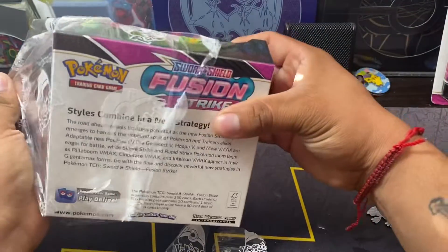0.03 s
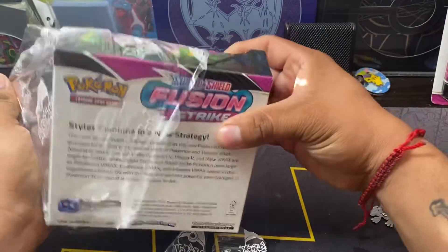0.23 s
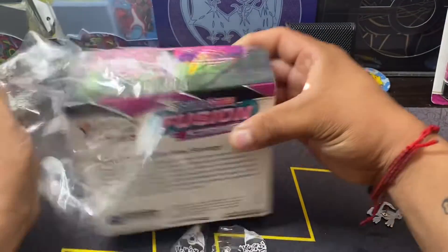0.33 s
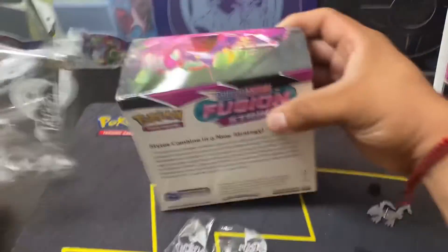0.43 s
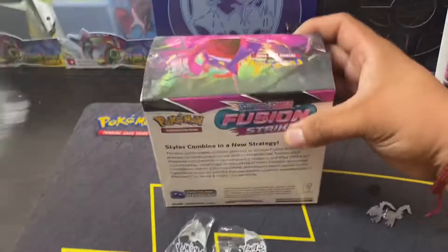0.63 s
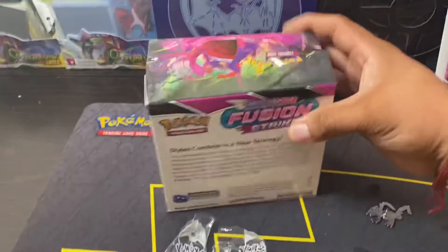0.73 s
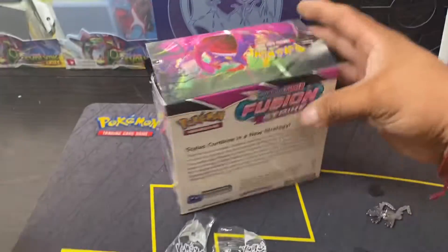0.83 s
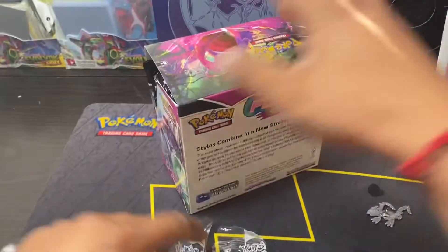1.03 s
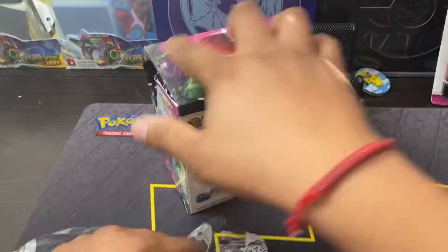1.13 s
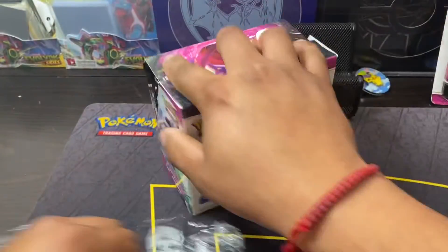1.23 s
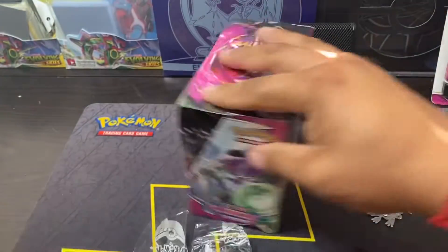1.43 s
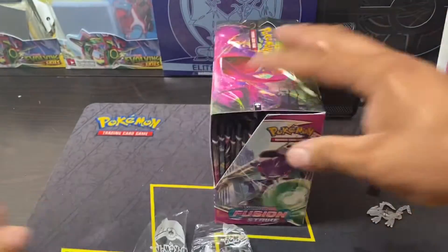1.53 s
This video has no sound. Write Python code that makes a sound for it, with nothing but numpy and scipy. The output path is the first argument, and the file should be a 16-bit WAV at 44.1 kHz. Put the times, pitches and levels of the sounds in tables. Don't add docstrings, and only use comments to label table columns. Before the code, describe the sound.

Plastic film tears off a small cardboard box in two quick, sharp bursts of snaps, knocking the hollow box; it thumps on a table, then loose wrap crinkles under fingers, close to the microphone in a small room.

```python
import sys
import numpy as np
from scipy import signal
from scipy.fft import rfft, irfft, next_fast_len
from scipy.io import wavfile
from scipy.ndimage import uniform_filter1d, map_coordinates

SR = 44100
rng = np.random.default_rng(int(sys.argv[2]) if len(sys.argv) > 2 else 0)


def decibels_to_gain(level_db):
    exponent = np.asarray(level_db, float) / 20
    return 10 ** exponent


def put_to_file(sound):
    columns = np.atleast_2d(sound).T
    safe = np.clip(columns, -1, 1)
    whole_steps = np.round(safe * 32767)
    wavfile.write(sys.argv[1], SR, whole_steps.astype(np.int16))


N = 70560

# [t/s, peak level/dB, film pitch f/Hz, how drawn out/ratio]
TEARING_SNAPS = [(.1968, -26, 5100, 1.5), (.2107, -9, 4400, .8), (.211, -8.5, 10700, .7),
                 (.2136, -11, 10500, 1.1), (.2325, -22, 10000, 2.6), (.2805, -25, 10000, 3.5),
                 (.2861, -5, 9500, .5), (.2872, -13.5, 11000, 1.2), (.2885, -14, 10000, 1.2),
                 (.2897, -18, 9500, 1.6), (.297, -24, 10500, 3.5), (.3245, -21, 9800, 1.5),
                 (.3405, -29, 3500, 1.3), (.3403, -27, 9200, 1.2), (.2866, -21, 3100, 1.5)]
# [t/s, peak level/dB, film pitch f/Hz, how drawn out/ratio]
SINGLE_CREASES = [(.0075, -37, 11500, 3.7), (0.0115, -34.5, 10500, 2.5), (.0195, -43, 12000, 2),
                  (.0634, -39.5, 1760, 1.5), (.0733, -37.5, 6530, 1), (.078, -28.5, 10900, 1.3),
                  (.1112, -43, 12200, 1.5), (0.117, -40, 10250, 1), (0.135, -36, 11000, 1.6),
                  (0.16, -44, 9900, 2), (.1812, -39, 10400, 3.5), (.2045, -29, 10900, 1),
                  (0.396, -38, 3650, 1), (.3958, -41, 10700, 1), (0.4107, -31, 9860, 0.66),
                  (.415, -38, 12200, 3), (.4501, -36, 5800, 1), (.4502, -39, 1800, 1.1),
                  (.4638, -37.5, 3550, 1.1), (0.464, -40.5, 6500, 1), (.466, -42, 11100, 2),
                  (0.563, -27, 9300, 1.1), (.563, -25, 5940, 1.1), (.5632, -36, 1990, 1.47),
                  (0.5825, -23, 11400, 2), (0.5827, -33, 9730, 1.5), (.5983, -37.5, 3420, 1.26),
                  (0.6038, -33.5, 9400, 1.2), (0.611, -37, 5700, 1), (0.6576, -45, 9000, 2.5),
                  (.7252, -34, 12700, 2.5), (0.7553, -36, 9540, 3), (0.7595, -31.5, 3980, 0.93),
                  (0.7604, -30.5, 4560, 2.2), (0.7606, -30, 6100, 2.2), (.8018, -37, 12500, 1.5),
                  (0.8054, -30, 11900, 1.1), (.8057, -34, 15000, 1), (.808, -35.5, 10800, 1.7),
                  (0.8144, -37.5, 3870, 1.5), (0.8154, -34, 12700, 2.9), (.859, -35.5, 4600, 3.2),
                  (.8625, -35.5, 10100, 2), (0.8762, -37, 10800, 1.2), (.8865, -37, 10200, 1.2),
                  (.8896, -34.5, 9800, 1), (0.8928, -37, 4400, 1.4),
                  (.9294, -43, 10100, 1.4), (0.9348, -38, 5170, .8), (0.9396, -31.5, 10900, 1),
                (.9452, -32, 10100, 1.2), (.946, -39, 5000, 1), (0.9672, -36, 5330, 3),
                (.97, -36, 11800, 2), (0.9792, -32.5, 3800, 1.6), (0.979, -32.5, 5500, 1.6),
                (.997, -33, 10800, 1.5), (.9992, -34, 11700, 2), (1.002, -36, 8900, .8),
                (1.013, -33, 11300, 1.2), (1.0132, -29, 5500, 1), (1.026, -31.5, 9900, 1.2),
                (1.0497, -28.5, 6300, 1.2), (1.095, -28, 14000, 1.5), (1.1106, -32, 11370, 1.2),
                (1.111, -34, 5470, 2), (1.1132, -31, 13000, 1.3), (1.129, -26, 5240, 1),
                (1.1362, -22, 10100, 1.08), (1.136, -25, 5540, 1), (1.139, -29.5, 11400, 4.2),
                (1.145, -34, 10500, 3.1), (1.154, -33, 10000, 1.5), (1.1548, -38, 5000, 1.5),
                (1.1688, -30, 12600, .8), (1.1738, -25, 13100, 1.2), (1.185, -31, 10900, 1),
                (1.1906, -25.5, 10900, 1.4), (1.194, -33, 12600, 1.5), (1.206, -31, 10700, 1.5),
                (1.288, -42, 1500, 4.2), (1.3738, -39, 8900, .8), (1.3739, -42, 1740, 0.86),
                (1.4415, -35, 10570, 0.95), (1.4418, -44.5, 1500, 0.9), (1.4417, -42, 6000, .8),
                (1.5134, -36, 10000, 1.5), (1.513, -44, 5800, 1), (1.5418, -37.5, 10900, 1.1),
                (1.541, -33.5, 5540, 0.74), (1.5416, -34, 7900, 1), (1.5417, -41, 1990, 0.7),
                (1.5544, -33.5, 5940, 1.2), (1.559, -41, 1700, 3)]
# [t/s, peak level/dB, film pitch f/Hz]
MORE_SNAPS = [(.1271, -44, 11100), (.2532, -24, 10200), (.255, -27, 5000), (.26, -22, 9050),
              (.4254, -34, 8600), (0.53, -44, 3500), (.5906, -40, 10700), (.642, -43.5, 5600),
              (0.649, -43.5, 3180), (.6768, -46, 11700), (0.743, -39, 9650), (0.7834, -39, 5080),
              (.9547, -42, 5700), (.9878, -36, 5500), (1.0715, -41, 13500), (1.121, -39, 8500),
              (1.2397, -39, 9400), (1.286, -38, 5080), (1.4852, -41, 12200)]
# [t/s, rustle level/dB, dull rubbing share/dB, slack film share/dB]
HAND_EFFORT = [(0, -52.5, 1.5, -6), (.045, -61.5, 1, -15), (.1, -47, -34, -22), (0.204, -54, 4.5, -1),
               (0.215, -32.5, -3.5, -27), (0.268, -35.5, -7, -28), (0.333, -38.5, -6.5, -7),
               (0.373, -52.5, -2.5, -1), (.52, -62.5, 2, 0.5), (0.606, -44.5, -5, -7),
               (.64, -55.5, -4, -2.5), (.8, -53, -8, -2.5), (1.02, -48, -2.5, 1), (1.074, -53, -6.5, 1.5),
               (1.15, -42, -7.5, -1.5), (1.295, -43.5, -14, -16), (1.4, -53, -24, -6), (1.56, -54, -2, -2)]
# [f/Hz, level/dB per Hz]
FILM_COLOUR = [(710, -65), (1200, -3.5), (2760, -8), (5220, -8.5), (8000, -10), (10500, -3.5),
               (15300, -9.5), (16000, -14), (16500, -47)]
# [f/Hz, level/dB per Hz]
RUB_COLOUR = [(100, -50), (180, -19.5), (347, -4.5), (600, -3), (950, 0), (1350, -7.5), (1800, -7.5),
              (2700, -28)]
# [t/s, level/dB, favoured f/Hz]
BOX_KNOCKS = [(0.2062, -50, 920), (.2118, -21, 776), (.232, -42, 700), (0.2864, -14.5, 902),
              (0.3176, -28.5, 350), (0.3214, -36, 670), (0.339, -40, 494), (.45, -41.5, 870),
              (1.0265, -59, 442), (1.035, -38, 850), (1.091, -42, 885), (1.441, -50, 1500)]
# [f/Hz, level/dB, time to fall 60 dB/s]
BOX_MODES = [(341, -10.5, 0.042), (522, 3.5, 0.012), (619, 6.5, 0.014), (716, 3.5, 0.013), (966, 2.5, 0.02),
             (1383, -5, 0.027), (1884, -3.5, 0.012)]
# [t/s, lowest tone level/dB, upper tones level/dB, softness/s,
# share of free ring time/ratio]
TABLE_THUMPS = [
    (0.319, -36.5, -52, 0.004, 0.85),
    (.6, -55.5, -59, 0.0085, 1),
    (1.024, -46, -36.5, 0.0051, 0.4),
    (1.049, -61, -43, .004, 0.22),
]
# [f/Hz, level/dB, time to fall 60 dB/s]
TABLE_MODES = [(61.2, 3.5, 0.65), (106, 3.5, 0.31), (238, -6, 0.22), (336.5, -4.5, 0.27)]
# [f/Hz, time to fall 60 dB/s]
WALL_DECAY = [(300, 0.18), (2000, 0.087), (12000, 0.17)]
# [f/Hz, level/dB per Hz]
AIR_COLOUR = [(45, 7.5), (120, -3), (175, -2.5), (300, -2), (927, -4), (2820, -23.5), (10700, -21),
              (15600, -12)]
# [f/Hz, width/Hz, level/dB]
FAN_HUM = [(41.8, 6.9, -62.5), (122, 7.5, -68)]


def unit(x):
    return x / np.sqrt(np.mean(x ** 2) + 1e-20)


def along(points, hz):
    f, v = np.transpose(points)
    return np.interp(np.log(hz + 1), np.log(f + 1), v)


def wobble(rate):
    knots = rng.standard_normal(int(N * rate / SR) + 4)
    return map_coordinates(knots, [np.arange(N) * rate / SR])


def filtered(x, response):
    m = next_fast_len(len(x) + 8192)
    return irfft(rfft(x, m) * response(np.fft.rfftfreq(m, 1 / SR)), m)[:len(x)]


def resonance(hz, width_hz):
    return lambda f: 1j * f * width_hz / (hz * hz - f * f + 1j * f * width_hz)


def noise(spectrum, patchy_db):
    z = signal.stft(rng.standard_normal(N + 512), nperseg=256)[2]
    field = uniform_filter1d(rng.standard_normal(z.shape), size=14, axis=0)
    field = uniform_filter1d(field, size=3, axis=1)
    patchy = signal.istft(z * decibels_to_gain(patchy_db * unit(field)), nperseg=256)[1][:N]
    return unit(filtered(patchy, lambda hz: decibels_to_gain(along(spectrum, hz))))


def ring(modes, rise_s, scatter_db):
    t = np.arange(SR // 2) / SR
    gains = rng.normal(0, scatter_db, len(modes))
    tones = 0
    for (hz, db, t60), gain in zip(modes, gains):
        tones = tones + decibels_to_gain(db + gain - 60 * t / t60) * np.sin(2 * np.pi * hz * t)
    return (1 - np.exp(-t / rise_s)) * tones


def add(track, s, sound):
    part = track[round(s * SR):][:len(sound)]
    part += sound[:len(part)]


def snap(db, hz, drawn=1):
    t = np.arange(4096) / SR
    white = rng.standard_normal((2, len(t)))
    broad = unit(filtered(white[0], lambda f: decibels_to_gain(along(FILM_COLOUR, f)) * resonance(hz, hz / 0.8)(f)))
    patch = unit(filtered(white[1], resonance(hz, hz / 6)))
    tone = decibels_to_gain(-3 - 4.1 * max(drawn - 1, 0)) * np.sin(2 * np.pi * hz * t)
    rise_s = 0.00035 * max(drawn, 1)
    rise = 1 - np.exp(-(t / rise_s) ** 2)
    fast_t60, slow_t60 = 0.006 * drawn, 0.04
    crack = decibels_to_gain(-60 * t / fast_t60) * (broad + decibels_to_gain(-3.7) * patch + 2 * tone)
    after = decibels_to_gain(-18.5 - 60 * t / slow_t60) * (broad + patch)
    burst = rise * (crack + after)
    return decibels_to_gain(db - 1) * burst / np.abs(burst).max()


def creases():
    out = np.zeros(N)
    for s, *crease in TEARING_SNAPS + SINGLE_CREASES + MORE_SNAPS:
        add(out, s, snap(*crease))
    return out


def tiny_crackle():
    grains_per_s, spread_db, cycles = 1600, 3, 0.7
    middle_hz, spread_octaves = 9000, 0.45
    draw = rng.random((int(grains_per_s * N / SR), 4))
    hz = middle_hz * 2 ** (spread_octaves * 3.3 * (draw[:, 1] - 0.5))
    hz = np.clip(hz, 500, 15500)[:, None]
    age = np.arange(256) / SR
    envelope = np.exp(-age * hz / cycles) * (1 - np.exp(-age / 0.0001))
    loudness = decibels_to_gain(-spread_db * np.log(draw[:, 2:3] + 1 / 50))
    grains = loudness * np.sin(2 * np.pi * hz * age) * envelope
    where = (draw[:, 0] * N).astype(int)[:, None] + np.arange(len(age))
    crackle = np.bincount(where.ravel(), grains.ravel(), N)[:N]
    return unit(filtered(crackle, lambda f: decibels_to_gain(1.8 * along(FILM_COLOUR, f))))


def rustle():
    s, *controls = np.transpose(HAND_EFFORT)
    t = np.arange(N) / SR
    level_db, rub_db, slack_db = (np.interp(t, s, c) for c in controls)
    patchy_db = 1.3
    film = decibels_to_gain(2.2 * wobble(45.48)) * (noise(FILM_COLOUR, patchy_db) + decibels_to_gain(-3) * tiny_crackle())
    slack = unit(filtered(film[::-1], lambda f: resonance(5000, 7000)(f) ** 2))
    slack = decibels_to_gain(slack_db + 2.1 * wobble(60.62)) * slack
    rub = decibels_to_gain(rub_db + 1.95 * wobble(35.52)) * noise(RUB_COLOUR + [(6000, -120)], patchy_db)
    return decibels_to_gain(level_db - 4.5) * (unit(film) + rub + slack)


def box():
    out = np.zeros(N)
    for s, db, near_hz in BOX_KNOCKS:
        modes = [(near_hz, 2.5, 0.019)]
        for hz, level, t60 in BOX_MODES:
            octaves_away = abs(np.log2(hz / near_hz))
            modes.append((hz, level - 2 * octaves_away, t60))
        add(out, s, decibels_to_gain(db - 6) * ring(modes, rise_s=0.0006, scatter_db=1))
    return filtered(out, lambda hz: (1j * hz / (1j * hz + 180)) ** 2)


def table():
    out, t = np.zeros(N), np.arange(SR // 2) / SR
    rattle_db, rattle_t60 = -14, 1
    for s, low_db, upper_db, soft_s, free in TABLE_THUMPS:
        modes = []
        for k, (hz, db, t60) in enumerate(TABLE_MODES):
            modes.append((hz, db + (upper_db if k else low_db), t60 * free))
        add(out, s, ring(modes, soft_s, scatter_db=0))
        rattle = unit(filtered(rng.standard_normal(len(t)), resonance(232, 76)))
        fade = decibels_to_gain(low_db + rattle_db - 60 * t / rattle_t60 / free)
        add(out, s, fade * (1 - np.exp(-t / soft_s)) * rattle)
    return out


def walls(x):
    out, step = np.zeros(N), 2048
    for start in range(0, N, step):
        hz, t, z = signal.stft(rng.standard_normal(SR // 4), SR, nperseg=256)
        fade = decibels_to_gain(-60 * t / along(WALL_DECAY, hz)[:, None])
        tail = signal.istft(z * fade, SR, nperseg=256)[1]
        tail = tail / np.linalg.norm(tail)
        add(out, start / SR + 0.004, signal.fftconvolve(x[start:start + step], tail))
    return out


def room_tone():
    hum = np.zeros(N)
    for hz, width_hz, db in FAN_HUM:
        hum += decibels_to_gain(db) * unit(filtered(rng.standard_normal(N), resonance(hz, width_hz)))
    return decibels_to_gain(-57) * noise(AIR_COLOUR, patchy_db=3.0) + hum


def scene():
    near = creases() + rustle() + box()
    mix = near + decibels_to_gain(-11.5) * walls(near) + table() + room_tone()
    return mix[None]


def low_pass(x):
    return signal.sosfilt(signal.butter(12, 16970, fs=SR, output="sos"), x)


def record(dry):
    top_hz, spill_db, low_hz = 15850, -30, 38

    def band_limits(hz):
        treble = np.where(hz < top_hz, 1, decibels_to_gain(spill_db))
        return treble * (1j * hz / (1j * hz + low_hz)) ** 2

    mix = filtered(dry[0], band_limits)
    return low_pass(mix[None])


dry = scene()
out = record(dry)
put_to_file(out)
```